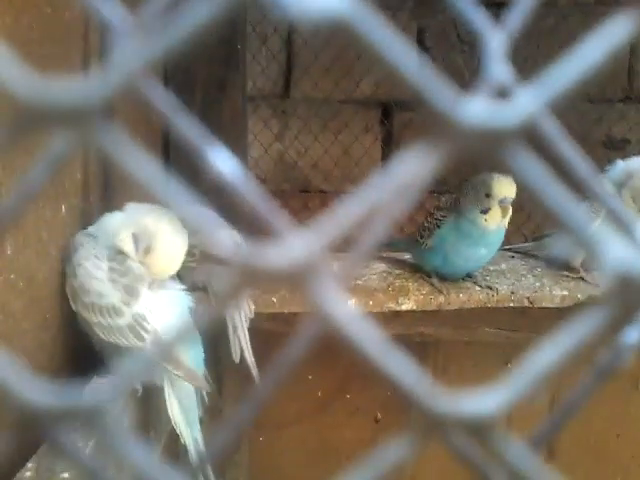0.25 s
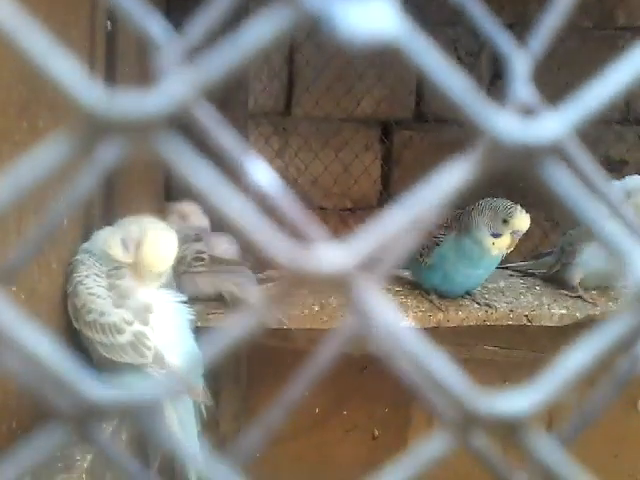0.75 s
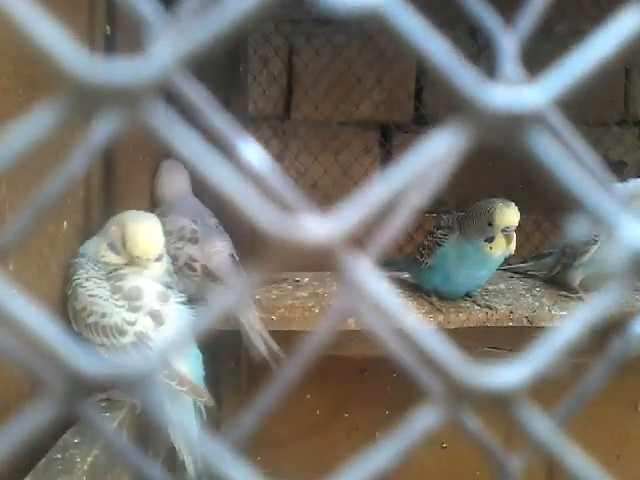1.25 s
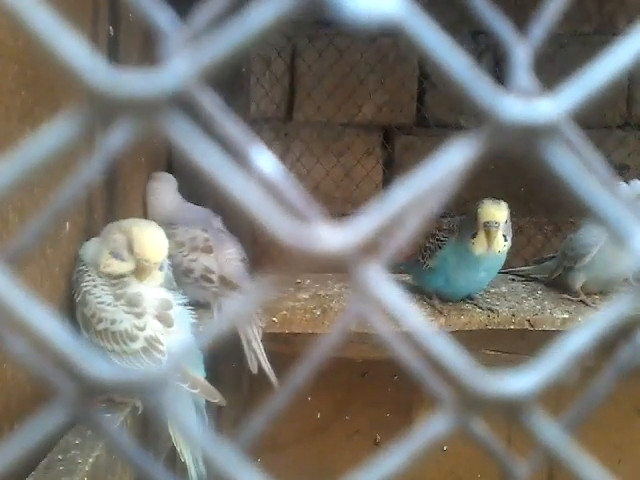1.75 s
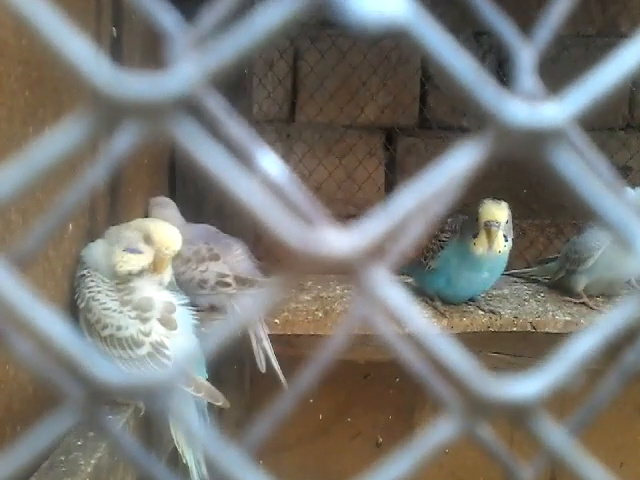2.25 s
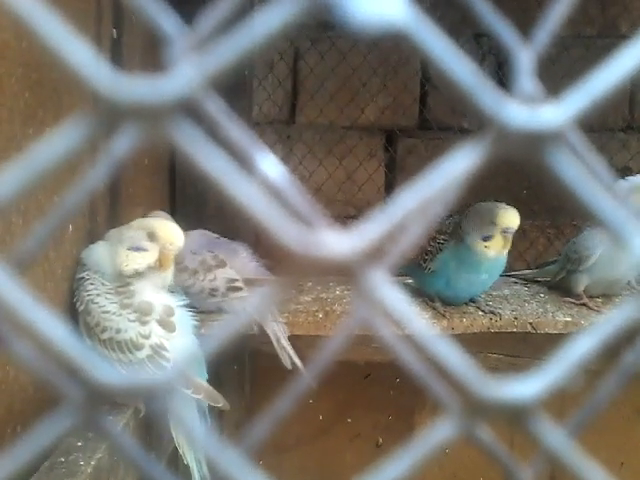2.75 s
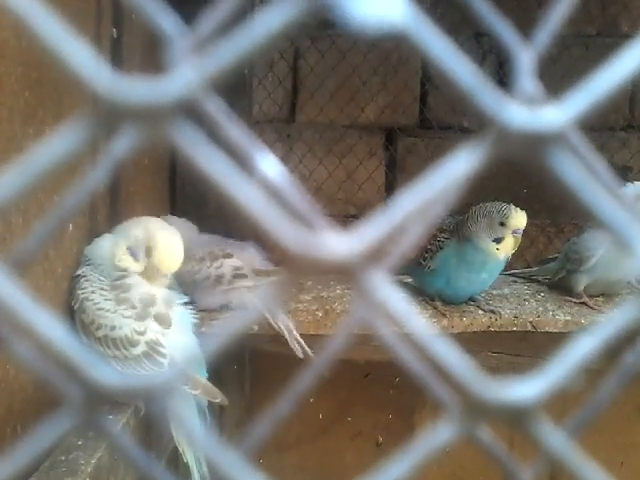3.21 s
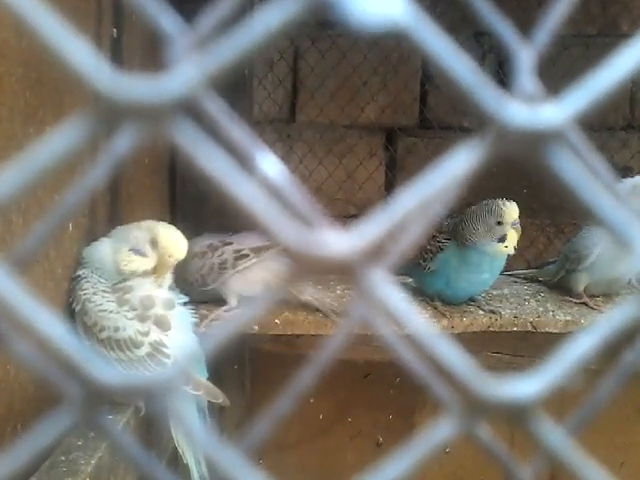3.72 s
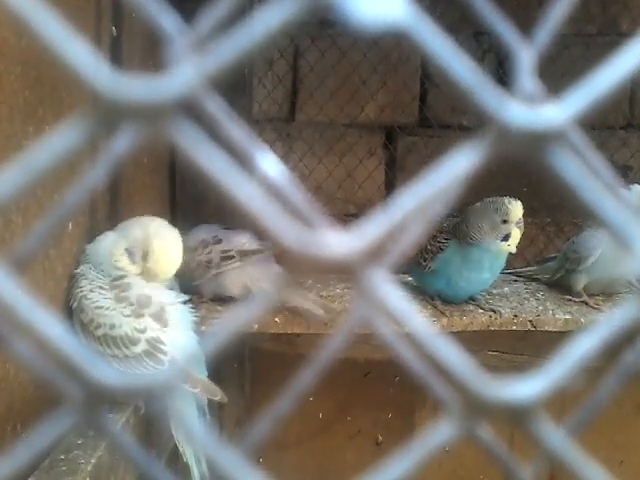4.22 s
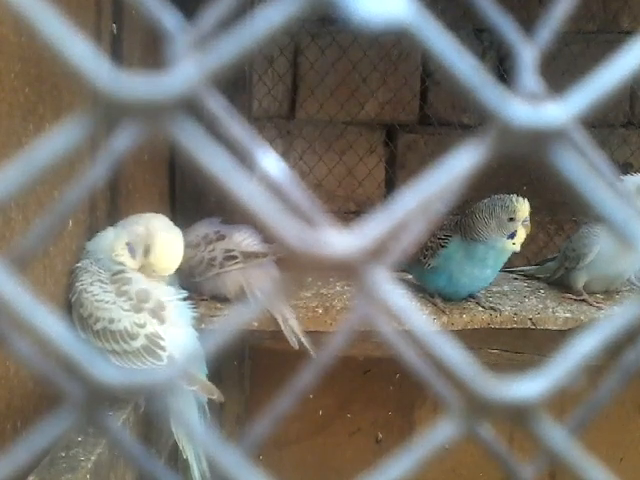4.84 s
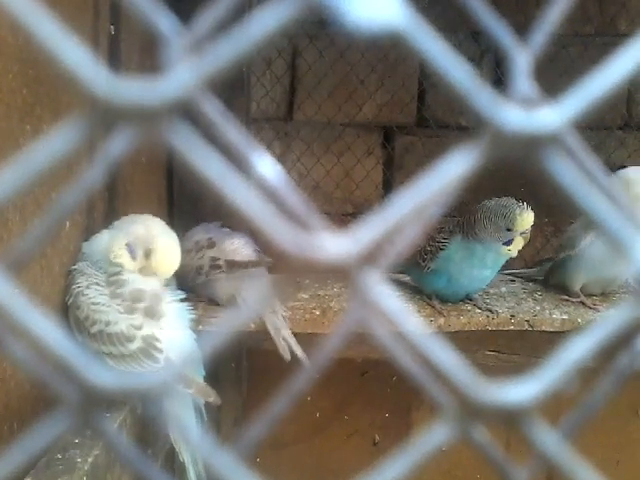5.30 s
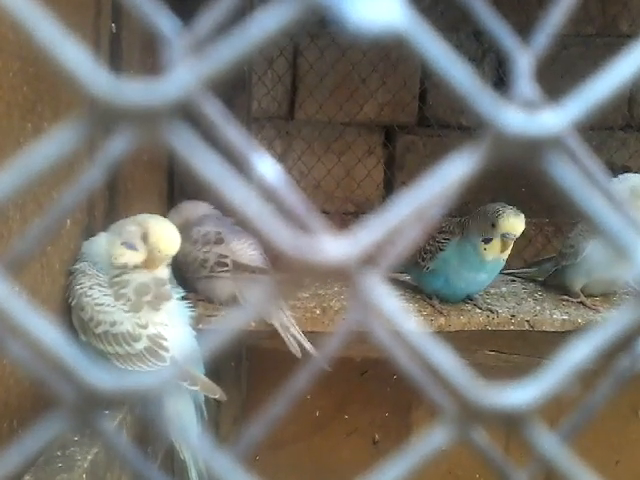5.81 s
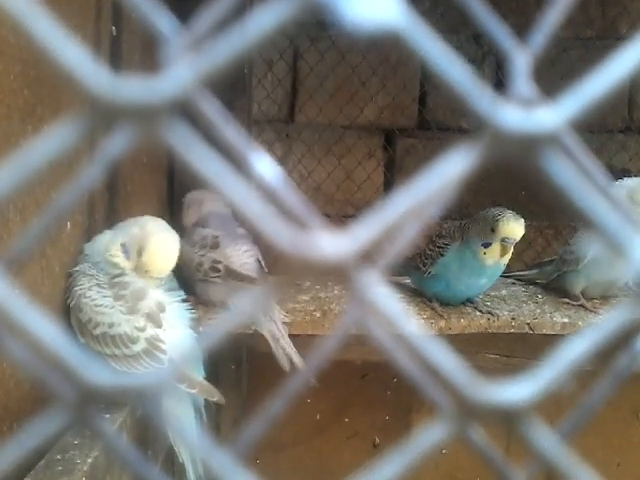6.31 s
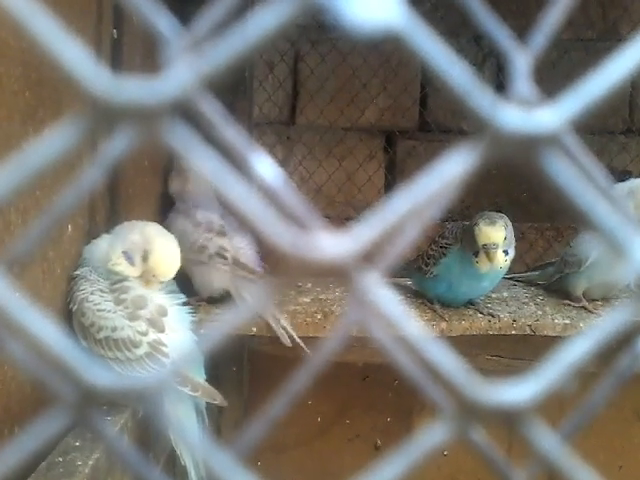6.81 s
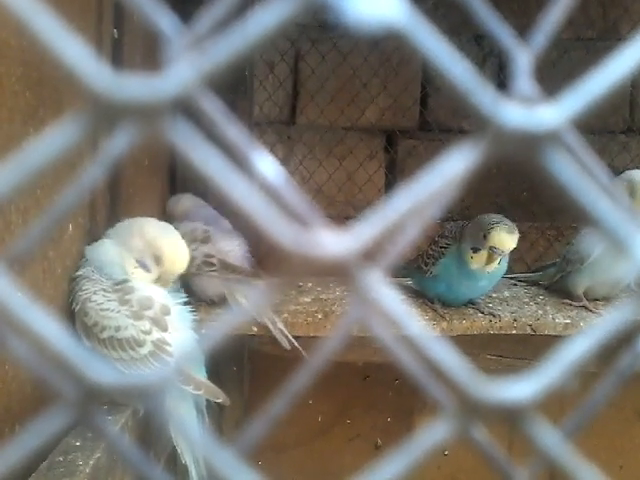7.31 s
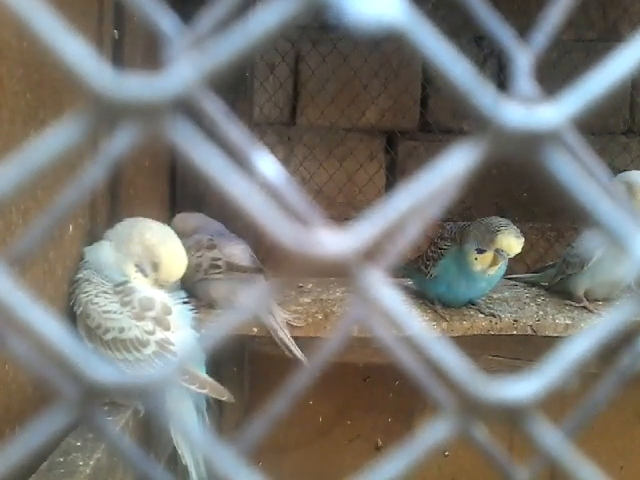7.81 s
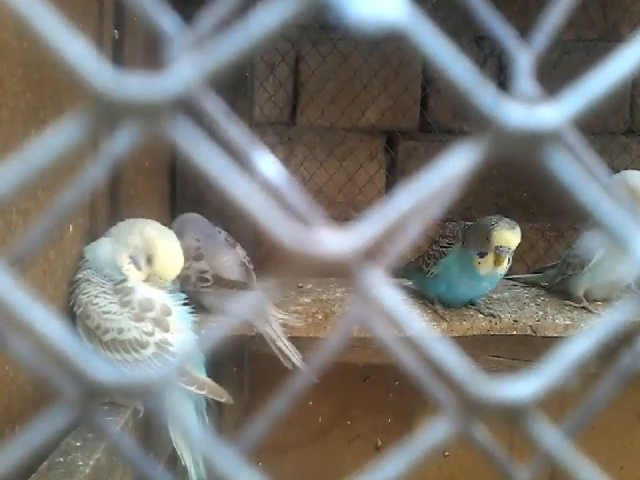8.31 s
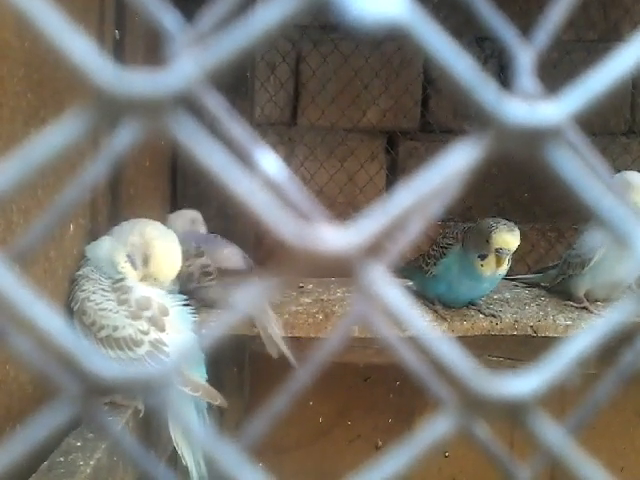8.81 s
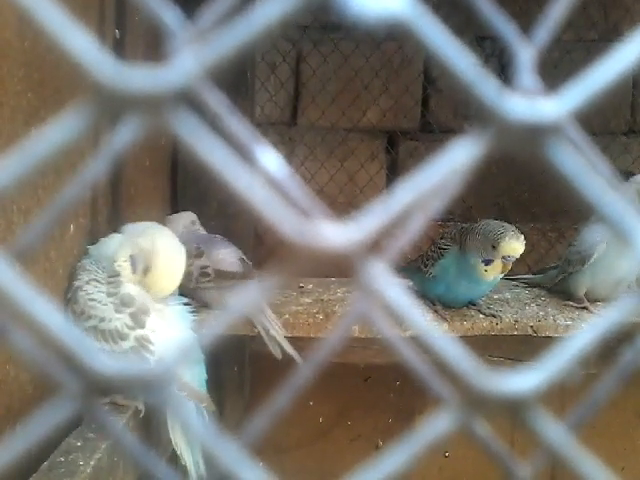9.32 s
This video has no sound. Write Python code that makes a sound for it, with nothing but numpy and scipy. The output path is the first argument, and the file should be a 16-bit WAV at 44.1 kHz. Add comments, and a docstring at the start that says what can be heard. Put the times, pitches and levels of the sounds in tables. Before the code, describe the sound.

Continuous bright budgie chatter, heard from close to the cage. It opens with scratchy squawks and busy twitter, then runs on as irregular clusters of high chirps, down-sliding whistles and occasional soft reedy notes. A quick clicking rattle comes around eight seconds, and a clear high whistle just before nine. Dull bumps are barely noticeable. Short woody reflections, quiet low rumble and faint hiss surround the birds.

```python
"""Small parrots chatter in a wooden aviary behind wire mesh, over low outdoor rumble and faint noise hiss.
From the start near birds squawk (pulsed tone and noise), a flock twitters behind (zigzag tones), and
near birds whistle short glides; clicks (ringing noise bursts) soon join. From 0.4 s come reedy calls
(five partials) and clear calls (tones along a tune), from 1 s soft bumps (sinking tones, woody noise).
The wooden walls answer the birds with brief, sparse echoes."""
import sys
import numpy as np
from scipy import signal
from scipy.fft import rfft, irfft
from scipy.io import wavfile
from scipy.ndimage import uniform_filter1d

SR = 44100
rng = np.random.default_rng(int(sys.argv[2]) if len(sys.argv) > 2 else 0)


def digitize_waveform(pressure):
    """Quantize a signal to 16-bit integers and store it at the path in sys.argv[1].

    Rows of a 2-D input are taken as channels; values are limited to [-1, 1].
    """
    field = np.atleast_2d(pressure).T
    bounded = np.clip(field, -1, 1)
    quanta = np.round(bounded * 32767).astype(np.int16)
    wavfile.write(sys.argv[1], SR, quanta)


N = 421155  # samples
EDGE_HZ = 15750  # top of the band


def gain_of(db):
    """Decibels to amplitude."""
    return 10 ** (np.asarray(db) / 20)


def evened(x):
    """Scales to rms 1."""
    return x / np.sqrt(np.mean(x ** 2) + 1e-20)


def read(points, hz):
    """Interpolates a curve on a log-frequency axis."""
    f, value = np.transpose(points)
    return np.interp(np.log(hz + 1), np.log(f + 1), value)


def add(mix, s, sound):
    """Mixes a sound in at time s."""
    part = mix[max(round(s * SR), 0):][:len(sound)]
    part += sound[:len(part)]


def coloured(points):
    """Steady noise of rms 1 with a given spectrum."""
    spectrum = rfft(rng.standard_normal(N))
    return evened(irfft(spectrum * gain_of(read(points, np.fft.rfftfreq(N, 1 / SR))), N))


def wobble(seconds):
    """Smooth random curve of rms 1 that changes over about this time."""
    span = max(round(seconds * SR), 2)
    return evened(uniform_filter1d(uniform_filter1d(rng.standard_normal(N), span), span))


def along_time(rows):
    """A level curve as gain for every sample."""
    s, db = np.transpose(rows)
    return gain_of(np.interp(np.arange(N) / SR, s, db))


# rumble level before its slow flutter: (t/s, level/dB)
RUMBLE_LEVEL = [(0, -47.5), (2, -47.5), (3.5, -48.5), (6, -46.5), (9.55, -46.5)]
# rumble spectrum: (f/Hz, relative level/dB)
RUMBLE_SPECTRUM = [(12, -28), (30, -4), (55, 5.5), (90, -3.5), (145, 0.5), (200, -9), (260, -15.5),
                   (600, -16), (1000, -37.5)]
# hiss spectrum: (f/Hz, relative level/dB)
HISS_SPECTRUM = [(300, 5), (900, -1), (1800, 10), (4000, -21), (7000, -11.5), (15700, -33.5)]


def outdoor_air(hiss_db=-58, flutter_db=0.82, flutter_s=0.034):
    """Low-frequency noise of fluttering level, over steady hiss."""
    rumble = along_time(RUMBLE_LEVEL) * gain_of(flutter_db * wobble(flutter_s)) * coloured(RUMBLE_SPECTRUM)
    return rumble + gain_of(hiss_db) * coloured(HISS_SPECTRUM)


# throat noise, also in twitter and clicks: (f/Hz, relative level/dB)
THROAT_NOISE = [(800, -22.5), (1500, -41.5), (2500, -2), (3500, 3), (5000, 3), (7000, -10.5), (9000, -30)]
# squawks: (t/s, length/s, first-half f/Hz, second-half f/Hz, level/dB,
#           breath re voice/dB, octave re voice/dB, pulse unevenness/0-1)
SQUAWK_CALLS = [(0.0,0.018,3350,2990,-23.5,-38,-22,0.57),(0.105,0.02,4400,3400,-20,-44,-25,0.87),(0.152,0.06,3040,2820,-20,-41,-11.5,0.34),(0.205,0.041,3266,3460,-26.5,-43,-35,0.74),(0.235,0.058,3256,2676,-18.5,-43,-19,0.56),
                (0.504,0.039,4080,3420,-25,-34,-16.5,0.47),(.598,0.0131,3780,2940,-17.5,-42,-23,0.59),(1.101,0.024,4600,4960,-25,-15,-22,0.65),
                (1.596,0.016,3240,2810,-15,-38,-33,0.64),(1.739,0.031,3510,4020,-20,-30,-15.5,0.91),(2.441,0.053,2676,3135,-18,-34,-1.5,0.39),(2.488,0.072,3244,3327,-18.5,-24.5,-5.5,0.29),
                (2.693,0.053,3230,3120,-19.5,-27.5,-10.5,0.3),(2.733,0.059,2820,2736,-25,-21,1.5,0.52),(2.942,0.018,3170,2620,-29.5,-37,-23,0.51),
                (4.345,0.029,3300,2880,-31,-35,-28,0.7),(4.621,0.016,5040,3180,-23,-40,-32,0.56),
                (4.718,0.1,2980,2756,-19,-34,-5,0.38),(4.775,0.08,3630,2990,-20.5,-26,-9.5,0.82),(4.948,0.058,2716,2614,-24.5,-37,-3.5,0.35),
                (5.002,0.046,3174,2550,-18,-32,-21,0.75),(5.236,0.091,3055,3345,-16.5,-37,-6.5,.5),(5.619,0.059,3036,3340,-18.5,-24,-1.5,0.11),(6.606,0.073,3330,3340,-17,-30,-9,0.36),
                (7.138,0.012,3194,3810,-14.5,-23,-21,0.46),(7.266,0.046,3210,2880,-26,-34,-30,0.56),(7.436,0.035,3350,3410,-15.5,-25,-30,0.49),(7.698,0.074,3190,3230,-17.5,-30,-10,0.29),
                (8.382,0.019,3330,2630,-25.5,-35,-10,0.53),(8.448,.1,3397,3185,-17.5,-29,-7.5,0.085),
                (8.577,0.014,3180,2740,-16,-25,-19,0.8),(8.838,0.015,3400,3350,-15.5,-23.5,-11,0.49)]


def squawks(rasp_db=-7, swing=0.051, third_db=-22, half_db=-17):
    """Unstable whistle and throat noise, chopped into double pulses as the membranes slap shut."""
    mean_pulse_hz, depth, split, pitch_chaos = 166, .75, .4, .08
    hurry, swell = wobble(.005), gain_of(2.5 * np.tanh(wobble(.004)))
    chaos, drift, rasp = wobble(.0006), .03 * wobble(.008), coloured(THROAT_NOISE)
    breath = coloured([(6000, -68.5), (8000, 66.5), (11000, 22.0), (15700, -22.5)])
    out = np.zeros(N)
    for s, length, first_hz, second_hz, db, top_db, octave_db, uneven in SQUAWK_CALLS:
        at = slice(round(s * SR), round((s + length) * SR))
        along = np.linspace(0, 1, at.stop - at.start)
        beat = 2 * np.pi * np.cumsum(mean_pulse_hz * (1 + uneven * 0.407 * hurry[at])) / SR
        twice = np.cos(2 * beat)
        gate = evened(1 - depth * (1 - uneven) * np.cos(beat) - split * twice) * swell[at]
        # pitch swings with each pulse, drifts and jitters
        unrest = -swing * (np.sin(beat) + np.sin(2 * beat) / 2) + drift[at]
        unrest += pitch_chaos * (0.33 + 0.657 * uneven) * chaos[at]
        hz = np.interp(along, [.25, .75], [first_hz, second_hz]) * (1 + unrest)
        turn = 2 * np.pi * np.cumsum(hz) / SR
        upper = (np.sin(2 * turn) + gain_of(third_db) * np.sin(3 * turn)) * (1 - 0.22 * twice)
        voice = np.sin(turn) + gain_of(octave_db) * upper + gain_of(rasp_db) * rasp[at]
        # every second cycle is weaker
        voice += gain_of(half_db) * (np.sin(turn / 2) / 2 + np.sin(turn * 3 / 2))
        rise_fall = np.clip(np.minimum(along * length / .006, (1 - along) * length / .012), 0, 1)
        rise_fall *= .5 + .5 * np.sin(np.pi * along)  # effort peaks mid-call
        add(out, s, gain_of(db) * (voice + gain_of(top_db) * breath[at]) * gate * rise_fall)
    return out


# falls in twitter level: (t/s, length/s)
FLOCK_HUSHES = [(0.018, 0.068), (0.315, 0.09), (0.624, 0.078), (0.923, 0.089), (1.414, 0.011),
                (1.504, 0.053), (2.286, 0.029), (2.574, 0.089), (2.975, 0.11), (3.168, 0.073),
                (3.413, 0.092), (3.623, 0.081), (3.985, 0.067), (4.3, 0.033), (5.068, 0.018), (5.554, 0.14),
                (5.976, 0.02), (6.832, 0.047), (7.085, 0.16), (7.389, 0.047), (7.648, 0.022),
                (7.808, 0.031), (8.82, 0.063), (9.223, 0.085)]


def hush(hush_db=-13, edge_s=0.024):
    """Gain that sinks smoothly while the flock falls quiet."""
    quiet = np.zeros(N)
    for s, length in FLOCK_HUSHES:
        add(quiet, s, np.ones(round(length * SR)))
    return gain_of(hush_db * uniform_filter1d(np.minimum(quiet, 1), round(edge_s * SR)))


# twitter level when fully roused and not hushed: (t/s, level/dB)
FLOCK_LEVEL = [(0, -23), (.3, -30), (.55, -53.5), (.9, -25.5), (1.4, -46.5), (2.1, -34), (2.9, -31),
               (3.5, -29.5), (4.3, -37.5), (5., -35.5), (5.9, -32.5), (6.5, -36.5), (7.2, -34), (7.6, -35),
               (8.7, -32.5), (8.87, -58.5), (9.15, -33.5), (9.55, -32.5)]


def bustle_of(near, loud_db=-27.5, calm_db=-36.5, roused_share=0.42, smooth_s=0.01, heard_fall_db_per_s=173):
    """Near calls rouse the flock; its twitter swells with them and sinks in the pauses."""
    span, fall = max(round(smooth_s * SR), 2), np.arange(N) * heard_fall_db_per_s / SR
    heard_db = 10 * np.log10(abs(uniform_filter1d(near ** 2, span)) + 1e-12)
    held_db = np.maximum.accumulate(heard_db + fall) - fall  # instant rise, linear fall
    roused_db = np.clip(held_db, calm_db, loud_db) - loud_db
    return along_time(FLOCK_LEVEL) * hush() * gain_of(roused_share * uniform_filter1d(roused_db, span))


# low notes reedy, high ones pure; also for whistles: (f/Hz, each overtone re the last/dB)
OVERTONE_STEPS = [(800, -5), (1400, -9), (2000, -17), (3000, -31), (4500, -38)]
# twitter level by pitch: (f/Hz, relative level/dB)
TWITTER_COLOUR = [(600, -20), (1300, -12), (2200, 2.5), (3200, 10), (4200, 8.5), (6000, -51)]


def warbler(low_hz, high_hz, mean_fall_s, mean_rise_s, silence_threshold):
    """One far bird: pitch zigzags in slow falls and quick rises, broken into syllables."""
    step, reach = rng.random((2, 1600))
    low_corner = np.arange(1600) % 2
    corners_s = np.cumsum(np.where(low_corner, mean_fall_s, mean_rise_s) * (.4 + 1.2 * step))
    place = np.interp(np.arange(N) / SR, corners_s, np.where(low_corner, reach, .4 + 0.99 * reach))
    hz = low_hz * (high_hz / low_hz) ** uniform_filter1d(place, 350)
    hz *= 1 + .018 * wobble(.001) + .03 * wobble(.007)

    turn, step_db = 2 * np.pi * np.cumsum(hz) / SR, read(OVERTONE_STEPS, hz)
    tone = sum(gain_of(k * step_db) * np.sin((k + 1) * turn) for k in range(3))
    syllables = np.clip(3.1 * (wobble(0.018) - silence_threshold), 0, 1)
    syllables *= uniform_filter1d(np.where(np.gradient(place) > 0, .6, 1.), 90)  # softer rises
    return tone * syllables * gain_of(read(TWITTER_COLOUR, hz)) * (1 + .4 * wobble(.0025))


def flock(bustle, behind_db=-2.0, low_db=-17.0):
    """High twitterers with scratchy breath; low warblers follow the bustle only in part."""
    high = sum(warbler(1500, 3700, .04, .024, 0.063) for bird in range(4))
    # evens the level when a bird pauses
    high /= np.sqrt(uniform_filter1d(high ** 2, 3000) + 0.012 * np.mean(high ** 2))
    high += gain_of(-21 + 5 * wobble(.008)) * coloured(THROAT_NOISE)
    low = sum(warbler(520, 2000, 0.066, .015, 0.38) for bird in range(3))
    return gain_of(behind_db) * high * bustle + gain_of(low_db) * evened(low) * bustle ** 0.54


def whistle(path_hz, quiver, edge, flick, bend=0.99):
    """Syrinx tone: quick downward flick, then a glide; membrane quiver breaks it into beads."""
    pitch_quiver, level_quiver = quiver
    along = np.linspace(0, 1, len(pitch_quiver))
    # bend < 1: glide fastest at the start
    hz = (path_hz[0] + (path_hz[1] - path_hz[0]) * along ** bend) * (1 + pitch_quiver)
    hz *= 1 + flick * np.exp(-np.arange(len(along)) / SR / 0.0016)
    turn, step_db = 2 * np.pi * np.cumsum(hz) / SR, read(OVERTONE_STEPS, np.mean(path_hz))
    tone = sum(gain_of(k * step_db) * np.sin((k + 1) * turn) * ((k + 1) * hz.max() < EDGE_HZ)
               for k in range(4))
    return np.sqrt(2) * tone * (1 + level_quiver) * signal.windows.tukey(len(along), np.clip(edge, 0, 1))


# whistled notes: (t/s, length/s, start f/Hz, end f/Hz, level/dB)
WHISTLED_NOTES = [(.026,0.075,1226,1740,-42.5),(.128,0.051,1870,1410,-36.5),(.481,0.012,2500,2600,-25),(.489,0.022,3490,3450,-22),
                  (.504,0.04,1950,1946,-33.5),(.507,0.016,5860,5630,-35),(.537,0.015,5450,5180,-29.5),(.537,0.01,2750,2530,-19),(.589,0.011,4340,4240,-18),
                  (.659,0.035,3350,3210,-33),(.7,0.024,4380,2900,-40),(.757,0.051,3160,2260,-34),(.812,0.02,2080,1880,-39),(.814,0.034,3700,3030,-31.5),(.857,0.048,3540,3320,-30),
                  (.882,0.025,5780,5320,-37),(.89,0.024,2713,2670,-32),(.969,0.038,3300,3620,-26.5),(.956,0.024,3850,3570,-32),(.988,0.022,1500,2720,-49),(1.004,0.027,5260,4370,-27.5),(1.032,0.016,4060,4780,-23.5),(1.055,0.019,5200,5840,-34),(1.041,0.04,2500,2880,-20),
                  (1.074,0.017,4300,4300,-29),(1.218,0.0077,3320,3230,-25.5),
                  (1.242,0.023,1900,2016,-32),(1.258,0.019,3430,3100,-18),(1.275,0.024,2800,2220,-24.5),(1.294,0.02,3570,3570,-23.5),(1.312,0.021,3450,2590,-19.5),(1.306,0.071,1960,1220,-33),(1.333,0.026,2600,2860,-21),
                  (1.355,0.01,3210,3130,-19),(1.478,0.048,1980,1175,-29.5),(1.568,0.023,3020,3300,-31.5),(1.622,0.045,3370,2010,-32),(1.676,0.024,1460,1690,-35),(1.713,0.035,1880,1600,-33.5),
                  (1.755,0.044,2780,2790,-24),(1.762,0.025,5900,5300,-24),(1.794,0.052,3760,1980,-25.5),(1.894,0.037,2600,2840,-32.5),(1.897,0.04,2010,1600,-37),(1.947,0.054,1850,2010,-32),
                  (1.991,0.027,3470,2840,-26.5),(2.024,0.065,3434,2470,-20.5),(2.086,0.0077,3420,3400,-22),(2.114,0.013,3320,3420,-23.5),(2.132,0.053,2900,2710,-28.5),
                  (2.17,0.027,3590,3020,-19),(2.197,0.021,2880,2690,-16.5),(2.221,0.017,3700,3200,-18),(2.33,0.027,3780,2770,-29.5),(2.366,0.021,3410,2660,-19.5),(2.388,0.014,3060,2460,-25),
                  (2.41,0.094,1920,2830,-34),(2.647,0.05,1110,833,-46),(2.794,0.058,1170,1034,-44),(2.895,0.072,976,828,-48),
                  (3.099,0.032,3520,2640,-24),(3.141,0.019,2440,2590,-33),(3.246,0.094,3460,3020,-27),(3.285,0.043,3550,2410,-21),(3.289,0.055,6260,4020,-32),
                  (3.33,0.044,2443,2580,-25.5),(3.36,0.033,3400,2610,-27),(3.37,0.03,967,916,-45.5),(3.451,0.03,1402,1350,-43),(3.484,0.028,3710,3210,-26.5),(3.508,0.03,3410,2400,-26),(3.538,0.038,1510,1920,-36),(3.576,0.039,2880,2360,-35),
                  (3.711,0.032,3610,2570,-25.5),(3.737,0.059,3470,2670,-30),(3.78,0.06,3200,2210,-32),(3.8,0.035,4750,3520,-32),(3.848,0.043,2436,2510,-32),(3.879,0.019,2720,2820,-25),(3.91,0.024,3500,2070,-31),(3.964,0.066,1980,1750,-37.5),
                  (4.088,0.032,3650,2800,-29),(4.136,0.0086,3400,3400,-32),(4.141,0.056,1894,1337,-36.5),(4.194,0.023,2670,2400,-25.5),(4.256,0.019,3420,3130,-22),
                  (4.286,0.03,3300,3263,-23),(4.352,0.043,1664,1570,-35.5),(4.371,0.05,3360,3200,-30.5),(4.455,0.027,1450,1110,-39.5),(4.459,0.081,2160,2790,-31),(4.462,0.07,3350,3120,-33),
                  (4.5,0.087,3310,3450,-27),(4.54,0.036,2900,3270,-27),(4.57,0.067,1760,1272,-44.5),(4.576,0.018,4020,4180,-21.5),(4.597,0.023,3760,3040,-23),(4.608,0.011,6930,6100,-35),(4.652,0.019,3970,3320,-27.5),
                  (4.678,0.025,3330,1390,-38),(4.72,0.02,1660,1630,-30.5),(4.854,0.059,3490,3140,-30),(4.902,0.045,3750,3590,-26.5),(4.878,0.044,5850,5900,-36),(4.856,0.011,1480,1370,-32),(4.944,0.024,4000,3220,-25.5),(4.95,0.034,5400,5230,-29.5),
                  (4.982,0.045,4040,3040,-23.5),(4.95,0.024,2685,2580,-31),(4.99,0.022,2510,2630,-23),(5.03,0.014,4610,5300,-32),(5.006,0.019,6330,6350,-29),(5.076,0.026,1550,1270,-37),(5.128,0.017,3070,2730,-19),
                  (5.16,0.018,3480,2400,-22.5),(5.318,0.036,1515,1150,-41),(5.33,0.043,2760,2420,-30),(5.401,0.031,1950,1990,-29),(5.426,0.031,3180,3080,-28.5),(5.455,0.011,1830,2020,-24.5),
                  (5.468,0.046,1150,935,-42.5),(5.501,0.037,2120,2830,-30.5),(5.517,0.019,3490,3270,-23),(5.53,0.032,924,540,-45),(5.605,0.033,3530,3180,-25.5),(5.676,0.02,3430,3030,-25.5),
                  (5.751,0.033,1447,1330,-38.5),(5.855,.03,3080,2270,-34),(5.951,0.021,2960,3430,-33),(5.963,0.074,1346,1022,-45),(6.092,.04,3420,2270,-37),(6.162,0.027,2920,2060,-36),(6.194,0.026,1305,1580,-36.5),
                  (6.23,0.043,1740,1480,-40),(6.352,0.032,3540,3590,-25.5),(6.375,0.045,3500,2620,-25),(6.375,0.034,6740,5260,-31.5),(6.375,0.058,1590,1500,-41.5),(6.402,0.016,3090,3600,-22.5),(6.468,0.041,2360,2700,-30),
                  (6.501,0.046,3520,2730,-28.5),(6.545,0.0083,4020,3980,-31),(6.565,0.038,3750,2960,-23),(6.696,0.0054,3300,3620,-19),(6.698,0.016,4230,4270,-21.5),(6.712,0.012,3750,2900,-18),(6.724,0.016,2720,2740,-20),(6.755,0.024,2470,2300,-33),(6.79,0.055,1363,1520,-42.5),
                  (6.884,0.045,4350,3180,-39.5),(6.93,0.027,3430,2530,-33.5),(7.004,0.035,3430,2710,-24.5),(7.054,0.014,3450,3200,-21),(7.11,0.039,1400,1704,-41),(7.14,0.011,4430,4600,-17.5),
                  (7.147,0.066,1596,1170,-43),(7.213,0.018,3500,3290,-24.5),(7.257,0.04,1940,1780,-38.5),(7.292,0.019,4500,4270,-28),(7.3,0.085,1610,1370,-43),(7.382,0.017,1980,1950,-36.5),
                  (7.439,0.044,4600,4200,-25.5),(7.46,0.026,4240,3730,-18),(7.568,0.041,3030,3330,-29.5),(7.571,0.034,1746,1374,-40),(7.61,0.014,3820,3750,-37),(7.628,0.015,3670,2960,-27.5),(7.833,0.044,3200,2970,-32),
                  (7.895,0.059,3340,2220,-36),(7.925,0.031,3120,2050,-43),(7.951,0.045,3194,3250,-25.5),(8.045,0.051,1455,1253,-37),(8.163,0.0095,3300,2800,-33),(8.178,0.013,1470,1270,-34.5),(8.238,0.017,1740,1480,-37),(8.27,0.032,3630,2515,-38),(8.288,0.027,1500,1280,-38.5),
                  (8.412,0.021,2830,2310,-35.5),(8.418,0.066,5250,4130,-39.5),(8.436,.014,2500,3020,-31.5),(8.595,0.014,3120,2400,-23),(8.608,0.033,3550,3310,-19.5),(8.635,0.011,3520,3180,-33),(8.651,0.021,3730,3100,-24.5),(8.699,0.031,2430,2390,-28),
                  (8.726,0.044,3310,2900,-27),(8.765,0.015,2360,2530,-30),(8.925,0.05,3380,2870,-26.5),
                  (8.96,0.031,2630,3420,-25),(8.995,0.031,2713,2084,-29.5),(9.022,0.026,2157,2560,-22.5),(9.04,0.015,3680,3300,-20.5),(9.063,0.035,2950,2700,-25.5),
                  (9.112,0.015,2310,2240,-30),(9.118,0.032,1823,1500,-29),(9.118,0.052,1052,703,-47),(9.156,0.036,3300,2560,-22),(9.192,0.031,2630,2980,-29),
                  (9.265,0.032,830,748,-47),(9.331,0.014,3370,3720,-28),(9.355,0.021,3050,2530,-26),(9.38,0.068,1850,1500,-33.5),(9.44,0.066,1273,764,-40),
                  (9.486,0.028,4630,4430,-33),(9.515,0.013,2670,2860,-23.5)]


def singers(edge=0.4, flick=0.07):
    """Near birds' whistled notes; membrane quiver is weaker on low pitches."""
    pitch_quiver = .011 * wobble(.0008) + .02 * wobble(.005)
    out, quiver = np.zeros(N), np.array([pitch_quiver, .9 * np.tanh(wobble(0.0023))])
    for row, (s, length, *path_hz, db) in enumerate(WHISTLED_NOTES):
        mine = quiver[:, 1911 * row:][:, :round(length * SR)]  # own stretch per note
        steadied = mine * min(np.mean(path_hz) / 3200, 1)
        add(out, s, gain_of(db) * whistle(path_hz, steadied, edge, flick))
    return out


# clicks, single or run together into a rattle: (t/s, level before attack and decay/dB)
CLICK_TIMES = [(0.09, -21), (0.8928, -17), (1.423, -19.5), (1.57, -29), (5.0137, -25), (5.605, -25),
               (5.828, -24), (6.013, -23.5), (7.017, -18), (8.048, -19.5), (8.089, -20), (8.094, -18),
               (8.108, -16), (8.12, -15), (8.127, -23), (8.134, -6), (8.141, -13.5), (8.148, -14),
               (8.341, -16.5), (8.358, -12.5), (9.328, -23), (9.4935, -17)]


def clicks(t60_s=0.022, rise_s=0.0012, throat_hz=3300, ring_db=-1.5):
    """Short bright noise bursts that ring the throat."""
    out, t, burst = np.zeros(N), np.arange(SR // 30) / SR, coloured(THROAT_NOISE)
    ring = gain_of(ring_db) * np.sin(2 * np.pi * throat_hz * t)
    for s, db in CLICK_TIMES:
        envelope = gain_of(db - 60 * t / t60_s) * (1 - np.exp(-t / rise_s))
        add(out, s, envelope * (ring + burst[round(s * SR):][:len(t)] / 2))
    return out


# soft reedy calls: (t/s, length/s, start f/Hz, end f/Hz, starting level/dB)
REEDY_CALLS = [(0.399, 0.11, 1098, 1090, -43), (2.575, 0.053, 994, 925, -37),
               (2.973, 0.1, 1388, 1186, -27.5), (4.886, 0.058, 890, 860, -41),
               (5.115, 0.055, 940, 790, -40)]


def reedy(partial_step_db=-6.5, fall_db=-26.0):
    """Low calls of five partials that die away gently."""
    out = np.zeros(N)
    for s, length, start_hz, end_hz, db in REEDY_CALLS:
        along = np.linspace(0, 1, round(length * SR))
        turn = 2 * np.pi * np.cumsum(start_hz + (end_hz - start_hz) * along) / SR
        tone = sum(gain_of(k * partial_step_db) * np.sin((k + 1) * turn) for k in range(5))
        add(out, s, gain_of(db + fall_db * along) * tone * signal.windows.tukey(len(along), .2))
    return out


# clear calls: (each overtone re the last/dB, tune as [(t/s, f/Hz, level/dB), ...])
CLEAR_TUNES = [(-25, [(.442, 3610, -34), (.455, 3450, -15), (.463, 3180, -31), (.474, 3000, -12.5),
               (.48, 3000, -17)]), (-22, [(.549, 3120, -14), (.557, 3520, -18.5), (.568, 4040, -17.5),
               (.577, 3470, -34), (.581, 3230, -18.5), (.592, 3220, -25)]), (-27, [(1.085, 3470, -18.5),
               (1.101, 3750, -19), (1.111, 2510, -19.5), (1.122, 3635, -22), (1.133, 3530, -14)]),
               (-36, [(1.16, 3190, -30), (1.17, 3230, -17), (1.183, 2950, -37), (1.2, 2800, -18.5),
               (1.208, 2770, -32)]), (-13.5, [(1.436, 2220, -21), (1.444, 2645, -15.5),
               (1.463, 2250, -40)]), (-32, [(5.198, 2450, -22), (5.208, 2480, -21), (5.216, 2590, -25),
               (5.232, 2550, -14)]), (-44.5, [(8.845, 4400, -25), (8.859, 4680, -11), (8.861, 5000, -23),
               (8.877, 4684, -10), (8.898, 4700, -20), (8.918, 4765, -16), (8.97, 4700, -19.5),
               (8.978, 4670, -36)])]


def clear_calls():
    """Clear whistles whose pitch and breath follow a tune."""
    out, quiver, tremble = np.zeros(N), .009 * wobble(.001), gain_of(2.0 * wobble(.002))
    for step_db, tune in CLEAR_TUNES:
        s, hz, db = np.transpose(sorted(tune))
        t = np.arange(s[0], s[-1], 1 / SR)
        start = round(s[0] * SR)
        turn = 2 * np.pi * np.cumsum(np.interp(t, s, hz) * (1 + quiver[start:][:len(t)])) / SR
        tone = sum(gain_of(k * step_db) * np.sin((k + 1) * turn) * ((k + 1) * hz.max() < EDGE_HZ)
                   for k in range(4))
        ends = np.clip(np.minimum(t - s[0], s[-1] - t) / .002, 0, 1)
        breath = np.sqrt(2) * gain_of(np.interp(t, s, db))
        add(out, s[0], breath * tone * ends * tremble[start:][:len(t)])
    return out


# soft bumps against the mesh: (t/s, starting level/dB, settled f/Hz)
MESH_BUMPS = [(1.648, -41.5, 483), (1.05, -35.5, 154), (2.059, -34, 100), (7.03, -34, 61.9),
              (8.148, -37, 67.3), (8.711, -35, 71), (9.048, -38.5, 168)]


def bumps(t60_s=0.22, knock_db=-12, knock_t60_s=0.33):
    """Dull push of air and mesh, a sinking tone, with a woody noise knock."""
    out, t = np.zeros(N), np.arange(SR // 5) / SR
    wood = coloured([(150, -12.5), (400, 0.5), (1000, -8), (2500, -37.5)])
    for s, db, hz in MESH_BUMPS:
        push = np.sin(2 * np.pi * hz * t * (1 + 1.3 * np.exp(-t / 0.0158)))
        add(out, s, gain_of(db - 60 * t / t60_s) * push)
        add(out, s, gain_of(db + knock_db - 60 * t / knock_t60_s) * wood[round(s * SR):][:len(t)])
    return out


# wall echo decay: (f/Hz, t60/s)
WALL_DECAY = [(800, 0.21), (3000, 0.12), (7000, 0.11), (10000, 0.12)]


def walls(x):
    """Sparse echoes of random sign, each band dying at its own speed."""
    taps = np.zeros(SR // 2)
    at = np.arange(200, len(taps) - 20, 20)
    taps[at + rng.integers(0, 20, len(at))] = rng.choice([-1., 1.], len(at))
    hz, t, z = signal.stft(taps, SR, nperseg=256)
    decay = gain_of(-60 * t / read(WALL_DECAY, hz)[:, None])
    tail = signal.istft(z * decay, SR, nperseg=256)[1]
    return signal.fftconvolve(x, tail / np.linalg.norm(tail))[:N]


def scene():
    """Birds, walls, outdoor air and bumps."""
    near = squawks() + singers() + clicks() + reedy() + clear_calls()
    far = flock(bustle_of(near))
    wet = walls(gain_of(-7.5) * near + gain_of(-9.5) * far)
    return (outdoor_air() + near + far + bumps() + wet)[None]


def record(dry):
    """Low-pass at the top of the band."""
    lowpass = signal.firwin(511, EDGE_HZ, window=("kaiser", 9), fs=SR)
    return signal.oaconvolve(dry, lowpass[None], "same")


dry = scene()
out = record(dry)
digitize_waveform(out)
```